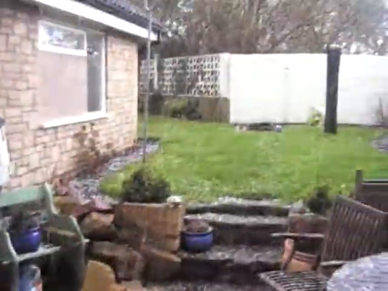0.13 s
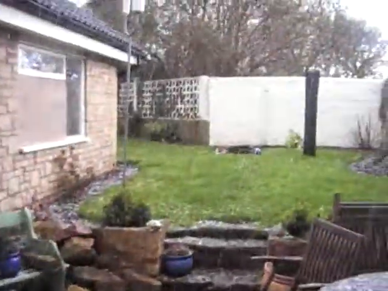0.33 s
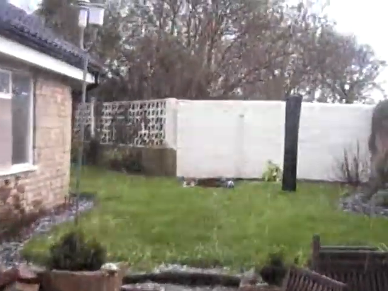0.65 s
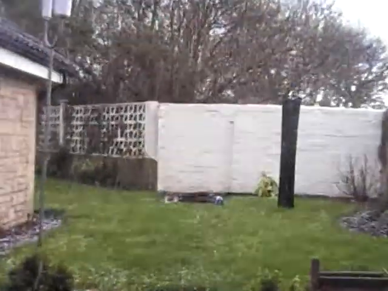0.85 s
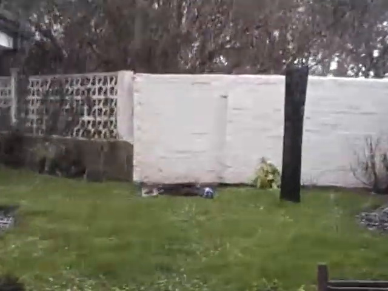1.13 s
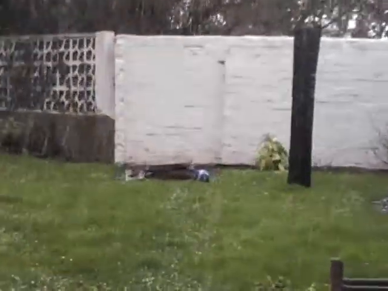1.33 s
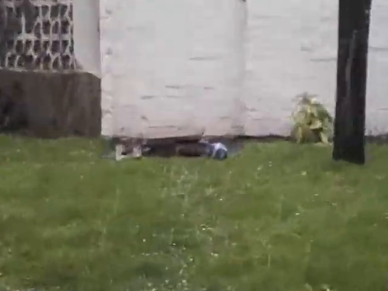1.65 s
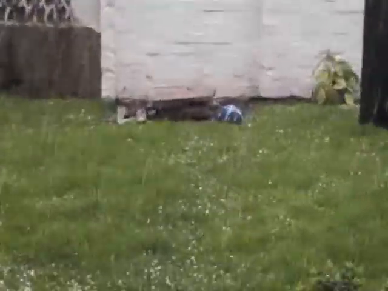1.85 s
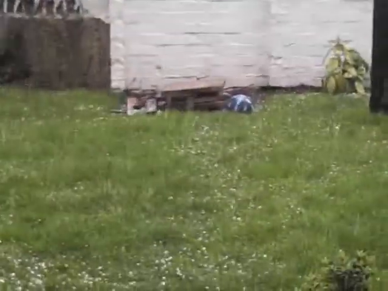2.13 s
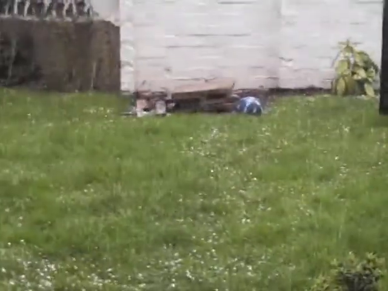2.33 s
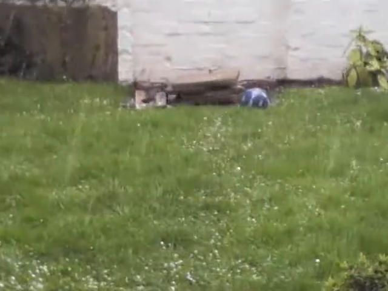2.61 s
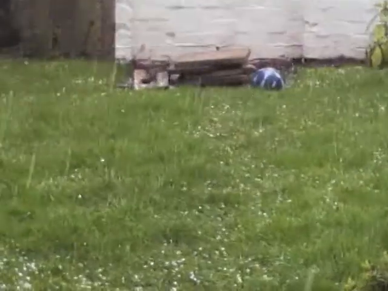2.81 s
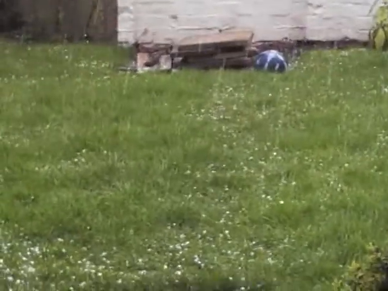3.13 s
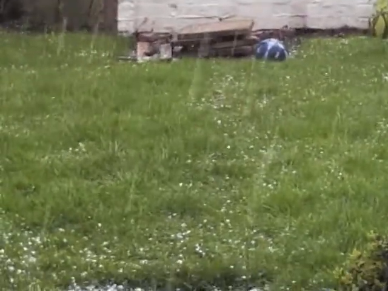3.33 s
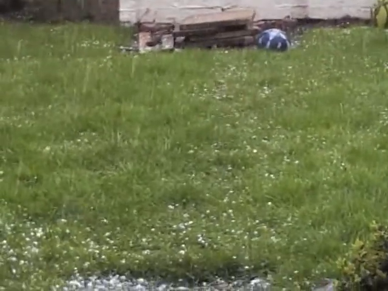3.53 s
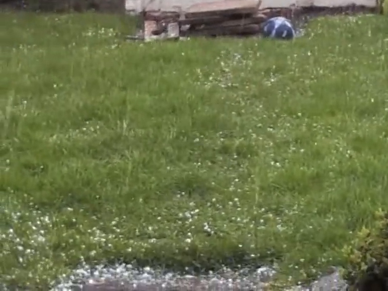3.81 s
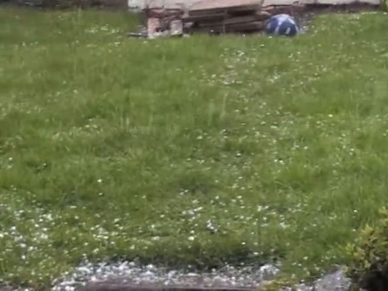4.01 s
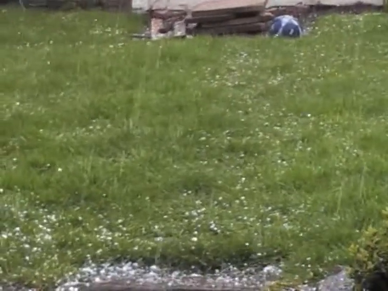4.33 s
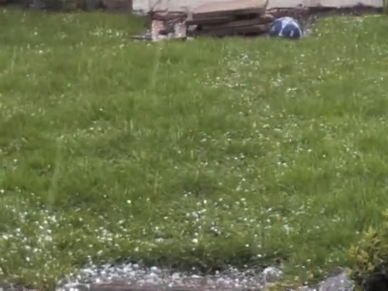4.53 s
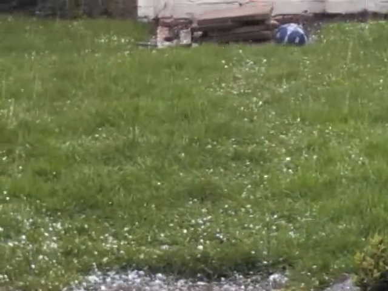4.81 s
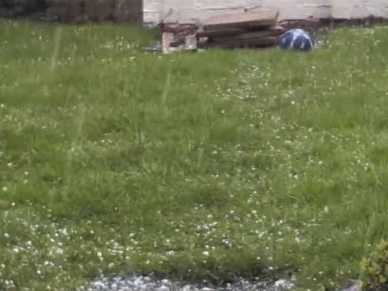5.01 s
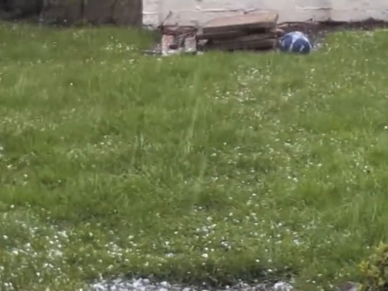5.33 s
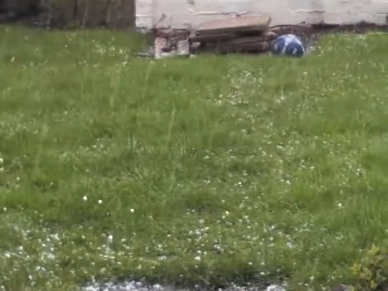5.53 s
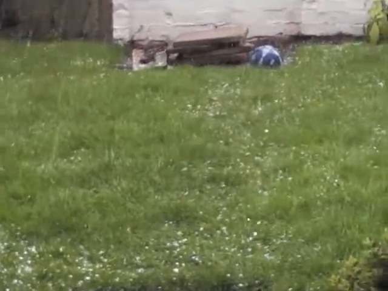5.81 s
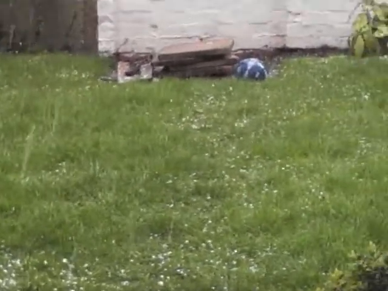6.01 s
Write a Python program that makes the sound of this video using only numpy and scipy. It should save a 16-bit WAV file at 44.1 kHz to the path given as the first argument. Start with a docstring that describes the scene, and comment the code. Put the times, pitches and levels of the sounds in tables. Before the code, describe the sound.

Small hailstones rattle densely on garden paving and wood, sharp close ticks and hollow knocks over a steady icy wash that slowly eases.

```python
"""Hail on a garden

Small hailstones fall densely on a garden, heard from the patio by two close microphone ports as the shower eases.
Far off, countless stones merge into a wash of shaped noise; nearer, random impacts tick on paving and patter on wood.
One strength of the shower drives all three. Over them lie single stones close by: damped clicks with splinters and
a bounce on the paving, clacks of noise on wood and pots, dry raps on wood and soft booms of a hollow panel."""
import sys
import numpy as np
from scipy import signal
from scipy.fft import rfft, irfft
from scipy.io import wavfile
from scipy.ndimage import uniform_filter1d

SR = 44100
rng = np.random.default_rng(int(sys.argv[2]) if len(sys.argv) > 2 else 0)


def wrap_up_sound(samples):
    """Save the sound to the file named by the first command line argument, as 16-bit audio."""
    columns = np.atleast_2d(samples).T
    # keep every value between -1 and 1, then stretch to whole-number steps
    tamed = np.clip(columns, -1, 1)
    steps = np.round(tamed * 32767).astype(np.int16)
    wavfile.write(sys.argv[1], SR, steps)


N = 271656  # length in samples

# Strength of the shower over the garden. Each row: time in seconds, strength in dB.
SHOWER_STRENGTH = [(0.0, -22.5), (0.48, -23), (0.93, -25), (1.37, -24), (2.13, -26), (2.47, -26.5),
                   (3.93, -27.5), (4.26, -27), (6.16, -27.5)]
# Spectrum of the far hail. Each row: frequency in Hz, relative density in dB per Hz.
FAR_SPECTRUM = [(25, -42), (55, -30), (100, -18), (160, -12.5), (215, -5), (330, -3), (450, 0.5),
                (800, 1.5), (1150, 2.5), (1800, 0.9), (2450, -0.5), (3200, -1.5), (4600, -7), (9500, -5),
                (12000, -9.5), (15700, -26)]
# Spectrum of ice on stone, all sizes together. Each row: frequency in Hz, gain in dB.
ICE_SPECTRUM = [(300, -20), (1200, -9), (3000, 0.5), (4600, 0.5), (7500, 2.5), (10500, 3), (13000, 0),
                (15800, -4)]
# Treble of large stones on stone. Each row: frequency in Hz, gain in dB.
BIG_ICE_SPECTRUM = [(8000, 1), (11000, 4), (15000, -9)]
# Modes of the wooden table and chairs. Each row: nominal frequency in Hz, relative level in dB, t60 in seconds.
WOOD_MODES = [(215, -40.5, 0.11), (445, -14.5, 0.54), (607, -2, 0.046), (743, -12, 0.22), (920, -7, 0.055),
              (1114, -3.5, 0.026), (1308, -4, 0.034), (1572, -6.5, 0.096), (1884, 3, 0.023),
              (2470, 4, 0.0078), (3120, -1.5, 0.016), (4050, -18, 0.0042)]
# Soft thuds on a wide hollow panel. Each row: start in seconds, level in dB before the fade-in, pitch in Hz.
PANEL_THUDS = [(0.431, -34, 208), (0.652, -33, 205), (.97, -31, 235), (2.331, -35, 243), (4.59, -34, 213)]
# Dry raps on wood close by. Each row: start in seconds, relative level in dB, pitch in Hz.
CLOSE_RAPS = [(1.0659, -19, 2500), (2.3619, -11, 1700), (2.41, -16, 1130), (2.6218, -17, 1400),
              (3.4930, -20, 1700), (3.9890, -17.5, 1600), (4.7610, -12.5, 3300), (4.82, -13, 1250),
              (4.9912, -23, 2200), (5.2727, -14, 2670)]
# Biggest stones on wood, pots and plants.
# Each row: start in seconds, relative level in dB, centre pitch in Hz, t60 in seconds, width in octaves.
HOLLOW_KNOCKS = [(0.003, -24.5, 890, 0.33, 0.66), (0.040, -24, 1200, .08, 0.77),
                 (0.085, -22, 1400, .06, 0.72), (0.139, -27, 1850, 0.063, 0.62),
                 (0.198, -23, 1200, .08, 0.52), (0.277, -21.5, 1010, 0.091, 0.73),
                 (0.318, -26.5, 1400, 0.098, 0.55), (0.425, -20.5, 2100, 0.088, 0.46),
                 (0.492, -27, 1500, 0.11, .5), (0.614, -24, 1290, .08, 0.77),
                 (0.822, -27, 1050, 0.087, 0.33), (1.062, -22.5, 1900, 0.13, 0.76),
                 (1.125, -23, 1400, 0.13, 0.96), (1.185, -26, 1800, .15, 1), (1.296, -23, 2400, 0.046, 0.8),
                 (1.381, -25.5, 1820, 0.19, 0.66), (1.421, -20.5, 3600, 0.066, 0.79),
                 (1.503, -25, 950, 0.13, 1), (1.533, -24.5, 1520, 0.1, 0.54), (1.592, -26, 910, 0.14, 0.85),
                 (1.722, -21.5, 2900, 0.054, .6), (1.924, -20.5, 1790, 0.18, 0.95),
                 (1.946, -30, 1620, 0.15, 0.33), (2.034, -24.5, 2100, .11, 0.73),
                 (2.333, -25.5, 1300, 0.16, 0.98), (2.362, -22.5, 1440, 0.14, 0.83),
                 (2.363, -24, 3940, 0.12, .25), (2.412, -26.5, 1410, 0.14, 0.58),
                 (2.481, -27, 1350, 0.18, 0.63), (2.519, -26, 1200, .1, 1), (2.604, -27, 1700, 0.064, 0.51),
                 (2.631, -23, 1880, 0.073, 1), (2.736, -29, 1700, .12, 0.55), (2.764, -25, 1250, .09, 0.74),
                 (2.975, -29, 1400, 0.088, 0.58), (3.002, -20, 2300, 0.053, 0.92),
                 (3.031, -25, 2400, 0.045, 0.54), (3.086, -25, 1300, .06, 0.35),
                 (3.317, -23, 3200, 0.043, 0.74), (3.352, -24, 1440, 0.12, .6),
                 (3.407, -28, 1400, 0.11, .7), (3.418, -22, 2180, 0.086, 0.6),
                 (3.451, -30, 1200, 0.14, 0.33), (3.494, -20, 2100, 0.17, 1), (3.527, -28, 1300, 0.11, 1),
                 (3.564, -28, 1300, 0.2, 1), (3.600, -26, 2500, 0.093, 0.44), (3.672, -28, 1900, 0.067, .9),
                 (3.992, -23.5, 1520, 0.1, 1), (4.262, -27, 696, 0.093, 1), (4.313, -24, 1730, 0.19, 0.63),
                 (4.384, -25, 2500, 0.083, 0.9), (4.455, -26.5, 1200, 0.18, 0.97),
                 (4.513, -26, 1900, 0.066, 0.25), (4.602, -28.5, 800, 0.14, 0.88),
                 (4.744, -26.5, 900, 0.2, 0.58), (4.75, -25, 3400, 0.11, 0.4), (4.839, -31, 1900, 0.07, .7),
                 (4.904, -24.5, 1900, 0.13, 1), (4.921, -27, 2100, 0.091, 1), (5.14, -27, 850, 0.064, 0.54),
                 (5.274, -23.5, 1900, .15, 0.85), (5.595, -24, 2600, .06, 0.35),
                 (5.716, -26, 1060, 0.19, 0.94), (5.882, -28, 1400, 0.086, 1), (6.032, -22, 1500, 0.05, 1),
                 (6.108, -29.5, 1000, 0.066, 0.64)]
# Biggest stones on the paving nearby.
# Each row: start in seconds, relative level in dB, pitch in Hz, splinters in dB relative to the click.
CLOSE_TICKS = [(0.283, -2.5, 6000, -6), (0.652, -10.5, 5900, 8), (1.095, -4.5, 7150, -4),
               (1.4627, -6, 6700, -11), (1.481, -9.5, 4600, 5), (1.6878, -3.5, 8100, -4),
               (1.7675, -0.5, 8400, 4.5), (2.23, -3.5, 8500, 6), (2.2673, -3, 6700, -8),
               (2.667, -7, 8400, 2), (2.9275, -7, 6400, 0), (2.9692, -9, 7500, -5), (3.4933, -9, 4180, -6),
               (3.7606, -13.5, 4700, 4), (3.988, -5, 6200, -8), (4.325, -9, 5700, -9),
               (4.431, -4, 8800, -14), (4.647, -11.5, 6500, -10), (4.7425, 1, 4930, -14),
               (4.8786, -13, 6900, -10), (4.934, -11, 8400, -2), (5.038, -12, 7000, -1),
               (5.3405, -11, 6300, -8), (5.5827, -6, 8000, -5), (5.9796, -7, 5960, -3)]
# Likeness of the two microphone ports in a diffuse field. Each row: frequency in Hz, coherence.
PORT_COHERENCE = [(30, .8), (70, 1), (150, 0.98), (1600, 0.98), (3600, 0.78), (7000, 0.75), (8600, 0.19),
                  (10000, 0.052), (15000, 0.14)]
# The house wall favours the left port. Each row: frequency in Hz, left minus right in dB.
WALL_LEAN = [(40, 4), (250, -0.5), (750, 2.7), (1400, 0.3), (7000, 1), (9500, 1.5), (11000, 1.5),
             (14000, 2)]
EDGE_HZ = 15850  # upper band edge of the recorder


def amp(db):
    """Decibels to gain."""
    return 10 ** (np.asarray(db) / 20)


def unit(x):
    """Scales to rms 1."""
    return x / np.sqrt(np.mean(x ** 2) + 1e-20)


def at_hz(points, hz):
    """Reads a spectrum on a log-frequency axis."""
    f, value = np.transpose(points)
    return np.interp(np.log(hz + 1), np.log(f), value)


def add(mix, s, sound):
    """Mixes a stereo sound in at time s in seconds, cut at the end of the mix."""
    part = mix[:, max(round(s * SR), 0):][:, :sound.shape[1]]
    part += sound[:, :part.shape[1]]


def colour(x, points):
    """Filters by a spectrum."""
    size = x.shape[-1]
    gain = amp(at_hz(points, np.fft.rfftfreq(size, 1 / SR)))
    return irfft(rfft(x) * gain, size)


def thin(x, corner_hz):
    """Small objects radiate little bass: a high-pass."""
    highpass = signal.butter(3, corner_hz, "high", fs=SR, output="sos")
    return signal.sosfilt(highpass, x)


def ports(pair):
    """Two unrelated signals become one diffuse sound at two close ports: alike in the bass, apart in the treble."""
    size = pair.shape[-1]
    a, b = rfft(pair)
    same = np.clip(at_hz(PORT_COHERENCE, np.fft.rfftfreq(size, 1 / SR)), -1, 1)
    mid = a * np.sqrt((1 + same) / 2)
    side = b * np.sqrt((1 - same) / 2)
    return irfft(np.array([mid + side, mid - side]), size)


def echoes(x, t60, taps_per_s):
    """Scattered, fading repeats of a sound from all directions."""
    t = np.arange(min(SR // 4, x.shape[1])) / SR
    taps = rng.standard_normal((2, len(t))) * (rng.random((2, len(t))) < taps_per_s / SR)
    tail = ports(taps * amp(-60 * t / t60))
    tail = tail / np.sqrt(np.sum(tail ** 2) / 2 + 1e-20)  # mean energy 1 per port
    return signal.oaconvolve(x.mean(0)[None], tail, axes=1)[:, :x.shape[1]]


def shower_db():
    """Strength of the shower at every sample."""
    return np.interp(np.arange(N) / SR, *np.transpose(SHOWER_STRENGTH))


def impacts(per_s, spread_db, limit):
    """Random arrivals of either sign: many weak impacts and a few strong ones, up to spread_db * limit."""
    hit = np.flatnonzero(rng.random(N) < per_s / SR)
    chance = rng.uniform(-1, 1, N)[hit]
    out = np.zeros(N)
    out[hit] = np.sign(chance) * amp(spread_db * np.minimum(-np.log(abs(chance)), limit))
    return out


def tick(hz, cycles, side):
    """Ice on stone: a click of a cycle or two, reaching the nearer port first."""
    port_delay_s = 2.4e-5
    lead_s = np.array([[1], [-1]]) * side * port_delay_s
    t = np.maximum(np.arange(-4, 256) / SR + lead_s, 0)
    age = 2 * hz * t / cycles
    return age * np.exp(1 - age) * np.sin(2 * np.pi * hz * t)


def wash(roar_db=-45.0, body_db=-7.0, hiss_db=-5.0, patchy_db=1.0, flicker_db=1.0, roar_hz=520, split_hz=3500):
    """Far hail merges into patchy noise: the low roar of the whole storm, a drumming body and an icy hiss."""
    frames, hz = N // 128 + 5, np.fft.rfftfreq(N, 1 / SR)
    z = rng.standard_normal((2, 257, frames)) + 1j * rng.standard_normal((2, 257, frames))
    # patches swell over neighbouring times and frequencies; flicker moves all frequencies together
    patches = uniform_filter1d(rng.standard_normal((257, frames)), size=7, axis=1)
    patches = unit(uniform_filter1d(patches, size=10, axis=0))
    flicker = unit(uniform_filter1d(rng.standard_normal(frames), size=5))
    z = z * amp(patchy_db * patches + flicker_db * flicker)
    noise = signal.istft(z, nperseg=512, noverlap=384)[1][:, :N]
    spectrum = rfft(colour(ports(noise), FAR_SPECTRUM))

    low = 1 / (1 + (hz / roar_hz) ** 8)
    below_hiss = 1 / (1 + (hz / split_hz) ** 4)
    bands = (low, below_hiss - low, 1 - below_hiss)
    roar, body, hiss = (unit(irfft(spectrum * band, N)) for band in bands)
    strength_db = shower_db()
    # the far storm eases only half as much, in dB
    roar = roar * amp(roar_db + .5 * (strength_db - strength_db.mean()))
    return roar + (body * amp(body_db) + hiss * amp(hiss_db)) * amp(strength_db)


def furniture(level_db=-7.5, per_s=130, spread_db=4.0, crack=0.65, echo_db=-4, focus_db=5, count=48):
    """Stones patter on wooden slats; each spot, dull or bright, rings with its own mix and tuning of the modes."""
    hz, db, t60 = np.transpose(WOOD_MODES)[:, :, None]
    t, out = np.arange(SR // 16) / SR, np.zeros((2, N))
    scatter = np.minimum(hz / 14000, .14)  # the higher the mode, the more it differs, up to a limit
    for spot_hz in np.geomspace(700, 3000, count):
        detune = rng.uniform(-1.7, 1.7, len(WOOD_MODES))[:, None]
        sign = rng.choice([-1, 1], (len(WOOD_MODES), 1))
        weight = sign * amp(-focus_db * abs(np.log2(hz / spot_hz)))  # modes near the spot's pitch lead
        tuned_hz = hz * np.exp(scatter * detune)
        modes = weight * amp(db - 60 * t / t60) * np.sin(2 * np.pi * tuned_hz * t)
        shatter = crack * rng.standard_normal(len(t)) * np.exp(-t / 0.0015)  # the ice breaks as it lands
        tap = unit(modes.sum(0) + colour(shatter, ICE_SPECTRUM))
        out += signal.oaconvolve(impacts(per_s / count, spread_db, limit=2.5), tap)[:N]
    out += amp(echo_db) * echoes(out, t60=0.13, taps_per_s=1600)
    return unit(thin(out, corner_hz=230)) * amp(shower_db() + level_db)


def paving(level_db=-5.0, per_s=600, spread_db=5.0, cycles=0.79, splinter_db=-2.5, echo_db=-7, count=56):
    """Small stones tick and splinter all over the patio; the smaller the stone, the higher its click."""
    out = np.zeros((2, N))
    sides = rng.permutation(np.linspace(-1.1, 1.1, count))
    for hz, side in zip(np.geomspace(2400, 10500, count), sides):
        click = unit(tick(hz, cycles, side)) * hz ** .4
        click = np.pad(click, ((0, 0), (0, 1500)))  # room for the splinters
        click = click + amp(splinter_db) * echoes(click, t60=0.045, taps_per_s=3700)
        hits = impacts(per_s / count, spread_db, limit=3.0)[None]
        out += signal.oaconvolve(hits, click, axes=1)[:, :N]
    out = colour(out + amp(echo_db) * echoes(out, t60=0.078, taps_per_s=1200), ICE_SPECTRUM)
    return unit(thin(out, corner_hz=606)) * amp(shower_db() + level_db)


def thuds(t60=0.14, rise_s=0.0052):
    """A wide panel booms briefly in its lowest mode: a fading sine with a soft start, alike at both ports."""
    t, out = np.arange(SR // 4) / SR, np.zeros((2, N))
    for s, db, hz in PANEL_THUDS:
        boom = amp(db - 60 * t / t60) * (1 - np.exp(-t / rise_s)) * np.sin(2 * np.pi * hz * t)
        add(out, s, np.array([boom, boom]))
    return out


def raps(level_db=1, ring_s=0.00034, echo_db=-5):
    """A stone close by raps on wood: a brief damped ring and a short scatter of echoes."""
    t, out = np.arange(SR // 12) / SR, np.zeros((2, N))
    for s, db, hz in CLOSE_RAPS:
        envelope = t / ring_s * np.exp(1 - t / ring_s)
        ring = amp(db + level_db) * envelope * np.sin(2 * np.pi * hz * t)
        rap = np.array([ring, ring])
        add(out, s, rap + amp(echo_db) * echoes(rap, t60=0.055, taps_per_s=1300))
    return thin(out, corner_hz=500)


def big_knocks(level_db=1.24, grain_db=4.0, splinter_db=-22, rise_s=0.00084, direct=0.33, direct_s=0.0029, echo_db=-9):
    """A large stone hits something hollow and shatters: a clack smeared by the echoes of the patio."""
    t, hz = np.arange(8192) / SR, np.fft.rfftfreq(8192, 1 / SR)
    out, splinters = np.zeros((2, N)), amp(splinter_db + at_hz(ICE_SPECTRUM, hz))
    for s, db, pitch, t60, octaves in HOLLOW_KNOCKS:
        grains = amp(grain_db * unit(uniform_filter1d(rng.standard_normal(len(t)), size=60)))
        hollow = np.exp(-.5 * (np.log2((hz + 1) / pitch) / octaves) ** 2)
        hollow = hollow * np.sqrt(pitch / (hz + 200))
        shape = hollow + octaves * splinters  # wider knocks splinter more
        clack = irfft(rfft(rng.standard_normal((2, len(t))) * grains) * shape)
        # grainy, but even in level before the decay
        clack = clack / np.sqrt(uniform_filter1d(clack ** 2, size=700) + 1e-20)
        blow = (1 - np.exp(-t / rise_s)) * (1 + direct * np.exp(-t / direct_s))  # stands out of its echoes
        add(out, s, amp(db + level_db - 60 * t / t60) * blow * clack)
    out = ports(out)
    return thin(out + amp(echo_db) * echoes(out, t60=0.26, taps_per_s=500), corner_hz=397)


def big_ticks(level_db=-1, cycles=1.08, bounce_db=-14):
    """Close stones crack on the paving, scatter splinters and land again a little later."""
    out = np.zeros((2, N))
    for (s, db, hz, splinter_db), (side, hop) in zip(CLOSE_TICKS, rng.random((len(CLOSE_TICKS), 2))):
        click = amp(db + level_db) * tick(hz, cycles, 2 * side - 1)
        click = np.pad(click, ((0, 0), (0, 2000)))  # room for the splinters
        add(out, s, click)
        add(out, s + 0.00097, amp(splinter_db) * echoes(click, t60=0.057, taps_per_s=5600))
        add(out, s + 0.035 + 0.074 * hop, amp(bounce_db) * click)
    return colour(thin(out, corner_hz=1210), BIG_ICE_SPECTRUM)


def scene():
    """All the hail, far to near, with the balance of the ports tilted by the house wall."""
    far = wash()
    patter = paving() + furniture()
    close = big_ticks() + big_knocks() + raps() + thuds()
    lean_db = at_hz(WALL_LEAN, np.fft.rfftfreq(N, 1 / SR))
    return irfft(rfft(far + patter + close) * amp([lean_db / 2, -lean_db / 2]), N)


def record(dry):
    """The recorder rounds off the very sharpest cracks, then limits the band."""
    rounded = dry / (1 + (dry / .85) ** 4) ** .25
    lowpass = signal.firwin(511, EDGE_HZ, window=("kaiser", 9), fs=SR)
    return signal.oaconvolve(rounded, lowpass[None], "same")


dry = scene()
out = record(dry)
wrap_up_sound(out)
```